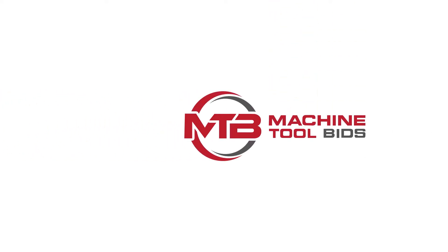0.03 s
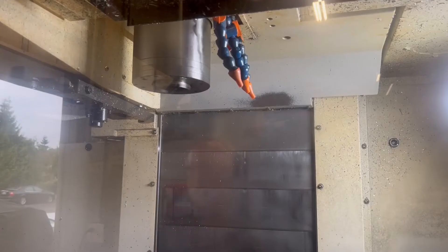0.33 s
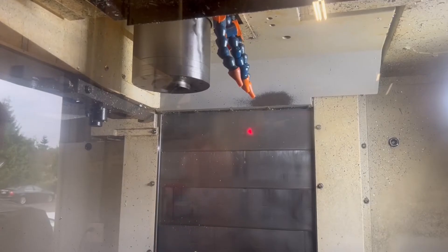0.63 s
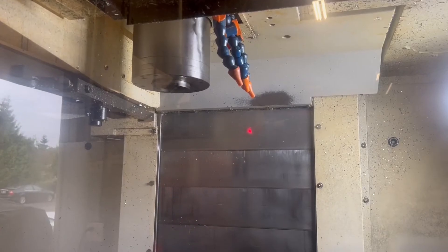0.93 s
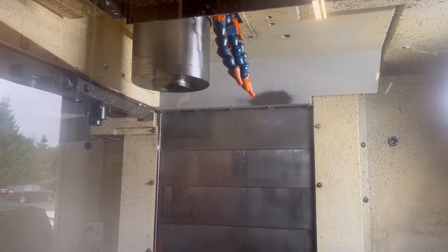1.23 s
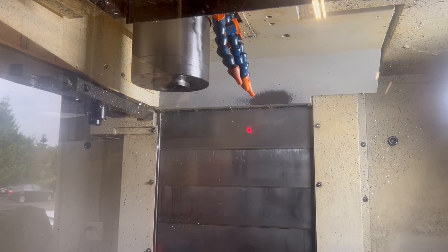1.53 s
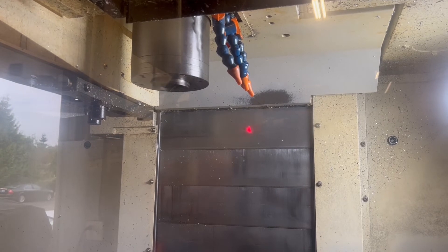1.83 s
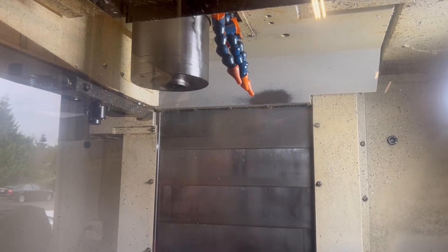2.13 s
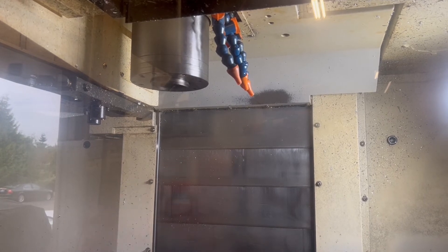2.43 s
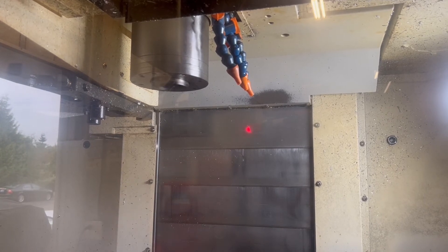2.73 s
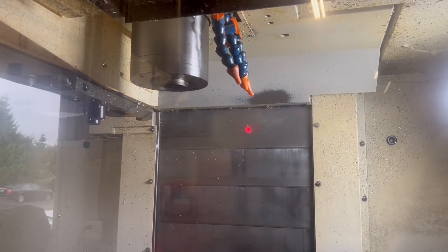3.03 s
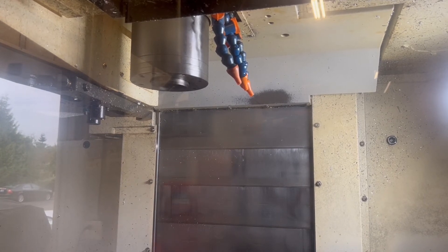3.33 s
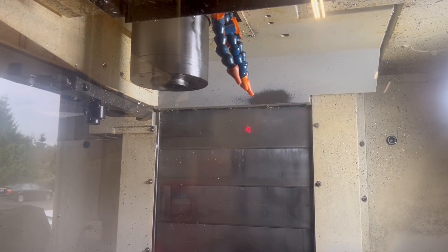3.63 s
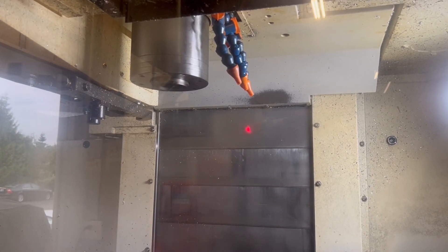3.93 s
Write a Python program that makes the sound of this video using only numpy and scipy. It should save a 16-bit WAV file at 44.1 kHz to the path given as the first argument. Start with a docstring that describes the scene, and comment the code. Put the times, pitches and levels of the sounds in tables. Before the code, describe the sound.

An idle machine tool hums and hisses steadily throughout, heard inside its sheet-metal enclosure: fan rumble, rushing air, thin motor whines and a faint rattle. At about 0.2 seconds, just after the sound cuts in, one loud knock makes a panel ring and boom briefly. The low drone swells around 2 seconds, then the wavering fan tone grows. Faint scuffs come and go, with a small metal chink near 3.3 seconds.

```python
"""A workshop, inside the sheet-metal enclosure of an idle machine tool.
The bed is fan rumble and rush, a steady hiss of air and a motor drone with thin whines on top.
Two fans hum at nearly the same pitch and beat; something loose rattles faintly.
Just after the sound cuts in, one knock makes a panel flex and ring and the enclosure boom.
A few faint scuffs and a small metal chink follow."""
import sys
import numpy as np
from scipy import signal
from scipy.fft import rfft, irfft, next_fast_len
from scipy.io import wavfile
from scipy.ndimage import uniform_filter1d, map_coordinates

SR = 44100
rng = np.random.default_rng(int(sys.argv[2]) if len(sys.argv) > 2 else 0)


def to_wav(sig):
    """Store sig (one row per channel, or 1-D mono) as 16-bit WAV at the path in sys.argv[1].

    Samples outside -1..1 are clipped; the rate is SR.
    """
    pcm = np.clip(np.atleast_2d(sig), -1, 1) * 32767
    pcm = np.round(pcm).astype(np.int16)
    wavfile.write(sys.argv[1], SR, pcm.T)  # frames by channels


N = 176400
T = np.arange(N) / SR

# Noise colours, before their envelopes: freq_hz, density_db_per_hz
CABINET_RUMBLE = [(18, -75), (33, -69), (45, -52.5), (56, -49.5), (75, -52.5), (98, -56.5), (128, -50.5),
                  (150, -56.5), (185, -51), (218, -51), (255, -51), (295, -56), (330, -56), (400, -63),
                  (500, -64), (620, -70), (1200, -100)]
FAN_RUSH = [(250, -87), (480, -61.5), (580, -65), (630, -66.5), (680, -66), (740, -67), (820, -64),
            (1080, -68.5), (1330, -67.5), (1850, -73.5), (2300, -74), (2900, -79.5), (5000, -100),
            (12000, -110)]
AIR_HISS = [(1500, -92.5), (3000, -80.5), (3900, -79), (4900, -80), (5800, -77), (6800, -77.5),
            (7900, -77.5), (9200, -84), (10500, -105)]
AIR_FIZZ = [(7000, -105), (9000, -85), (10000, -87), (11500, -84.3), (12300, -88), (13300, -94),
            (15700, -93.5)]
ENCLOSURE_BOOM = [(50, -66), (95, -47), (150, -47), (220, -40.5), (400, -44.5), (600, -41.5), (800, -44.5),
                  (1020, -47.5), (1350, -48), (1550, -51.5), (1850, -58), (2100, -54.5), (2900, -58.5),
                  (3600, -66), (5600, -67), (9000, -84), (15000, -101.5)]
# How alike the noise is left and right: freq_hz, correlation
STEREO_LIKENESS = [(60, .99), (170, 0.95), (250, 0.74), (330, 0.75), (440, 0.37), (640, 0.14), (850, 0.43),
                   (1050, 0.075), (1300, 0.83), (1600, 0.57), (2000, 0.15), (2300, 0.5), (3000, 0.16),
                   (4700, 0.41), (6500, 0.26), (8500, 1), (12000, 0.18)]
# Where the noise sits (every pan is left minus right): freq_hz, pan_db
STEREO_PAN = [(60, 1.5), (180, 1), (270, 2.5), (470, 1.5), (620, 0.5), (850, .5), (1300, -1.5), (2300, 0),
              (3200, 1.5), (4300, 4), (5700, 8), (6600, 7), (7500, 1.5), (8600, -1), (11000, 0.5)]
# How far its left side runs ahead: freq_hz, lead_rad
STEREO_LEAD = [(100, 0), (350, 0), (800, -0.76), (1050, -0.7), (1300, -2), (1600, -2.5), (1950, -2.5),
               (2250, 1), (3000, 1), (3900, 0.84), (4800, 0.46), (6000, 1.5), (8500, 1.07), (12000, -1.5)]
# Slight rise and fall in the loudness of the rumble and rush: time_s, gain_db
RUMBLE_RUSH_RIDE = [(.3, -0.35), (.65, -0.6), (.88, 0.3), (1.15, -0.2), (1.6, -0.7), (2.05, 0.15),
                    (2.4, -0.55), (3.0, 0.6), (3.5, 0), (3.9, 0.5)]
# Swell of the motor drone: time_s, level_db
DRONE_RIDE = [(.2, -38), (.8, -38), (1.9, -39), (2.05, -28.5), (2.29, -30.5), (2.42, -42.5), (3.2, -38.5),
              (3.9, -45)]
# Thin motor tones and whines: pitch_hz, level_db, pan_db, waver_share
MOTOR_WHINES = [(188.4, -45, .5, .6), (262, -42.5, 2.5, .6), (1248, -54.5, -5, .25), (1285, -60, -5, .5),
                (1333, -58, -5, .3), (2283, -66, -2, .5), (3198, -67.5, 1, .3), (3499, -69, 3, .3),
                (4203, -68, 5, .3), (6438, -68.5, 6, .3), (8016, -67, 0, .3)]
# Swells of the blade tone: time_s, level_db
BLADE_RIDE = [(.2, -42), (1.95, -40), (2.35, -34.5), (2.7, -33.5), (2.95, -39), (3.12, -32.5), (3.35, -39),
              (3.65, -36), (3.85, -31.5)]
# Where the blade tone sits: time_s, pan_db
BLADE_PAN = [(.2, -5), (1.8, -13), (2.4, -1.5), (3.9, -1.5)]
# Its overtones, against its average level: harmonic_number, gain_db
BLADE_OVERTONES = [(3, -22), (4, -24)]
# Faint rubs, bell-shaped in time and pitch: peak_s, spread_s, centre_hz, width_octaves, level_db, pan_db
SCUFF_CUES = [(0.241, 0.0086, 1800, 0.62, -36, 2), (.86, 0.019, 900, 0.67, -37.5, -2),
              (1.465, .03, 5650, .11, -42, 8), (3.12, 0.04, 7800, 0.061, -38.5, 3),
              (3.133, 0.027, 4230, 0.56, -39, 6), (3.26, .03, 5800, .3, -47, 8)]
# A small metal part touches twice: start_s, level_db
CHINK_CUES = [(3.268, -27), (3.285, -41)]
# Bending waves of the knock and its rebound; the last three rows are flutter echoes of the thump: delay_s,
# start_hz, pitch_halving_s, rise_s, t60_s, level_db
BENDING_WAVES = [(0, 1532, 0.0041, 0.0014, 0.02, 1.5), (.00235, 766, 0.07, 0.0017, 0.043, -5.5),
                 (.0045, 202, 0.18, .002, .04, -8.5), (0.0177, 264, 0.2, 0.0039, 0.058, -0.5),
                 (.043, 258, 0.17, 0.0018, 0.031, -14), (.059, 199, .2, .002, 0.041, -11.5),
                 (0.077, 211, .2, .002, 0.029, -16)]
# Ringing modes of the struck panel: pitch_hz, level_db, t60_s
PANEL_MODES = [(183, -19, 0.25), (213, -23, 0.27), (256.4, -16.5, 0.32), (340, -27, 0.23),
               (497, -17.5, 0.16), (676, -19, 0.15), (767, -25, 0.09), (790, -17.5, .15),
               (914, -22.5, 0.15), (1120, -27, 0.12), (1314, -18, .12), (1364, -24, 0.14),
               (5670, -34, 0.13)]
# Where the knock sits: freq_hz, pan_db
KNOCK_PAN = [(130, 2), (640, 6), (1000, -5), (1410, -15), (3100, -4), (6800, 12)]

FAN_HZ, KNOCK_S = 527.5, 0.1768


def amp(db):
    """Decibels to gain."""
    return 10 ** (np.asarray(db) / 20)


def unit(x):
    """Scale to rms 1."""
    return x / np.sqrt(np.mean(x ** 2) + 1e-20)


def along(points, hz):
    """Read a curve on a log frequency axis."""
    freqs, values = np.transpose(points)
    return np.interp(np.log(hz + 1), np.log(freqs + 1), values)


def ride(points):
    """A fader move: straight lines between timed points."""
    return np.interp(T, *np.transpose(points))


def wobble(rate_hz):
    """A smooth random curve with rate_hz knots a second."""
    return map_coordinates(rng.standard_normal(400), [T * rate_hz + 2], mode="mirror")


def dying(t, t60_s):
    """Exponential decay, 60 dB down after t60_s."""
    return np.exp(-np.log(1000) * t / t60_s)


def attack(t, rise_s):
    """A rounded onset from 0 towards 1."""
    return 1 - np.exp(-t / rise_s)


def filtered(x, response):
    """Equalise x with a gain that is a function of frequency."""
    size = next_fast_len(N + SR // 4)
    return irfft(rfft(x, size) * response(np.fft.rfftfreq(size, 1 / SR)), size)[..., :N]


def pan(db):
    """Left and right gains of constant total power; positive is left."""
    gains = amp(np.array([[.5], [-.5]]) * db)
    return gains / np.sqrt(np.mean(gains ** 2, axis=0))


def left_lead(rad):
    """Left and right phase turns that put the left ahead."""
    return np.exp(1j * np.array([[.5], [-.5]]) * rad)


def band(centre_hz, width_octaves):
    """Stereo noise of rms 1 in one resonance."""
    bell = lambda hz: np.exp(-.5 * (np.log2((hz + 1) / centre_hz) / width_octaves) ** 2)
    return unit(filtered(rng.standard_normal((2, N)), bell))


def wavering(hz, waver):
    """A tone of rms 1 that wavers in strength and phase."""
    swing = 1 - waver + waver * (wobble(7) + 1j * wobble(7))
    return unit(np.real(swing * np.exp(2j * np.pi * hz * T)))


def air(spectrum, patchy_db):
    """Coloured noise with faint patches of gain in time and pitch, spread across left and right."""
    cells = signal.stft(rng.standard_normal((2, N)), nperseg=512)[2]
    patches = uniform_filter1d(rng.standard_normal(cells.shape[1:]), size=6, axis=0)
    patches = uniform_filter1d(patches, size=14, axis=1)
    pair = signal.istft(cells * amp(patchy_db * unit(patches)), nperseg=512)[1][:, :N]
    width = lambda hz: np.arccos(np.clip(along(STEREO_LIKENESS, hz), -1, 1)) / 2
    colour = lambda hz: amp(along(spectrum, hz)) * [np.cos(width(hz)), np.sin(width(hz))]
    mid, side = filtered(pair, colour)
    placement = lambda hz: pan(along(STEREO_PAN, hz)) * left_lead(along(STEREO_LEAD, hz))
    return np.sqrt(SR / 2) * filtered(np.array([mid + side, mid - side]), placement)


def airflow(rumble_sway_db=0.55, rush_sway_db=0.64):
    """Cabinet rumble and fan rush rise and fall slightly, together and apart; the hiss holds steady."""
    rumble = air(CABINET_RUMBLE, patchy_db=0.27) * amp(rumble_sway_db * wobble(6.3))
    rush = air(FAN_RUSH, patchy_db=1.28) * amp(rush_sway_db * wobble(3.87))
    hiss = air(AIR_HISS, patchy_db=.5) + air(AIR_FIZZ, patchy_db=-2.0)
    return amp(ride(RUMBLE_RUSH_RIDE)) * (rumble + rush) + hiss


def motors(drone_hz=57.26):
    """A low motor drone with one big swell, under thin wavering whines."""
    drone = amp(ride(DRONE_RIDE)) * wavering(drone_hz, waver=0.33)
    whines = sum(amp(db) * pan(pan_db) * wavering(hz, waver) for hz, db, pan_db, waver in MOTOR_WHINES)
    return drone + whines


def rattle(taps_per_s=40, pitch_hz=2310, pitch_spread=0.132, t60_s=0.037, growth_db_per_s=1.7):
    """Something loose buzzes faintly in tiny irregular taps that slowly grow."""
    taps = np.zeros((2, N + SR))
    t = np.arange(SR // 25) / SR
    for when, pitch, strength, side in rng.random((round(taps_per_s * N / SR), 4)):
        start = int(when * N)
        hz = pitch_hz * (1 + pitch_spread * (2 * pitch - 1))
        gain = strength * amp(-42.5 + growth_db_per_s * when * N / SR)
        stereo_phase = np.array([[0], [np.pi]]) * (side - .5)
        ring = np.sin(2 * np.pi * hz * t + stereo_phase) * dying(t, t60_s)
        taps[:, start:start + len(t)] += gain * ring
    return taps[:, :N]


def twin_fan(beat_hz=4.8, drift_hz=1.06, level_db=-45):
    """A second fan turns slightly faster than the main one, so their blade tones beat."""
    hz = FAN_HZ + beat_hz + drift_hz * wobble(4.06)
    return np.sqrt(2) * amp(level_db) * np.sin(2 * np.pi * np.cumsum(hz) / SR)


def fan_hum(drift_share=0.0006, flutter_db=1.5, rough_share=0.27, rough_rate_hz=28):
    """The main fan's blade tone flutters in turbulent air and swells; its overtones stay faint."""
    phase = 2 * np.pi * np.cumsum(FAN_HZ * (1 + drift_share * wobble(8.77))) / SR
    level_db = ride(BLADE_RIDE)
    flutter = amp(flutter_db * np.array([wobble(8.9), wobble(17)]))
    turbulence = 1 + rough_share * (wobble(rough_rate_hz) + 1j * wobble(rough_rate_hz))
    tone = np.real(turbulence * np.exp(1j * phase) * left_lead(rad=0.67))
    blade = amp(level_db) * flutter * pan(ride(BLADE_PAN)) * tone
    overtones = sum(amp(level_db.mean() + db) * np.sin(k * phase) for k, db in BLADE_OVERTONES)
    return np.sqrt(2) * (blade + overtones)


def scuffs():
    """Brief, soft rubs, each fading in and out in one resonance."""
    return sum(amp(db) * pan(pan_db) * band(hz, width) * np.exp(-.5 * ((T - peak_s) / spread_s) ** 2)
               for peak_s, spread_s, hz, width, db, pan_db in SCUFF_CUES)


def chinks():
    """Light metal contacts on the left ring briefly in a cluster of close modes."""
    touch = lambda t: attack(t, rise_s=0.0017) * dying(t, t60_s=.05)
    envelope = sum(amp(db) * touch(np.maximum(T - start_s, 0)) for start_s, db in CHINK_CUES)
    return pan(db=14) * band(centre_hz=5700, width_octaves=.04) * envelope


def bending_wave(delay_s, start_hz, halving_s, rise_s, t60_s, db):
    """Sheet metal carries treble fastest, so a blow arrives as a falling chirp."""
    t = np.maximum(T - KNOCK_S - delay_s, 0)
    cycles = start_hz * halving_s * np.log1p(t / halving_s)
    return -amp(db) * np.sin(2 * np.pi * cycles) * attack(t, rise_s) * dying(t, t60_s)


def enclosure_boom(t, crossover_hz=1330):
    """The enclosure answers the blow; its lows hang on longer than its highs."""
    boom = air(ENCLOSURE_BOOM, patchy_db=3.0)
    lows = filtered(boom, lambda hz: 1 / (1 + (hz / crossover_hz) ** 4))
    tail = lows * dying(t, t60_s=0.25) + (boom - lows) * dying(t, t60_s=0.07)
    return tail * attack(t, rise_s=0.003)


def knock(crack_db=-21, crack_cutoff_hz=3600):
    """The contact cracks; the panel flexes, rebounds and rings, and the enclosure booms."""
    t = np.maximum(T - KNOCK_S, 0)
    flex = sum(bending_wave(*wave) for wave in BENDING_WAVES)
    contact = filtered(rng.standard_normal((2, N)), lambda hz: 1 / (1 + (hz / crack_cutoff_hz) ** 2))
    crack = amp(crack_db) * unit(contact) * (t > 0) * dying(t, t60_s=0.032)
    ring = sum(amp(db) * np.sin(2 * np.pi * (hz * t + rng.random())) * dying(t, t60_s)
               for hz, db, t60_s in PANEL_MODES)
    hit = crack + flex + ring * attack(t, rise_s=.008)
    return filtered(hit, lambda hz: pan(along(KNOCK_PAN, hz))) + enclosure_boom(t)


def scene():
    """The idling machine as a bed, with the scuffs, chinks and knock on top."""
    bed = airflow() + motors() + rattle() + twin_fan() + fan_hum()
    return bed + scuffs() + chinks() + knock()


def record(dry, start_s=0.1377, fade_s=0.0011, high_cut_hz=15800):
    """Silence until the sound cuts in; a hard high cut trims the top."""
    gate = np.clip((T - start_s) / fade_s, 0, 1)
    return filtered(dry * gate, lambda hz: hz < high_cut_hz)


dry = scene()
out = record(dry)
to_wav(out)
```